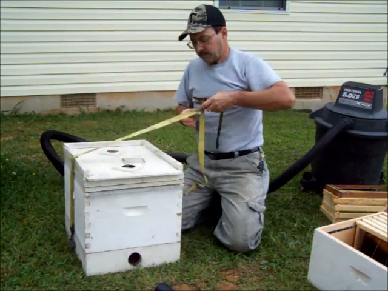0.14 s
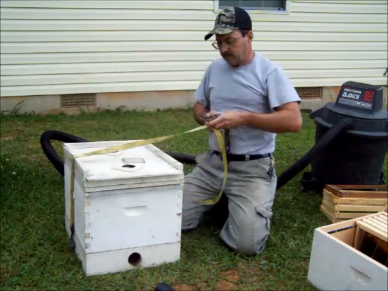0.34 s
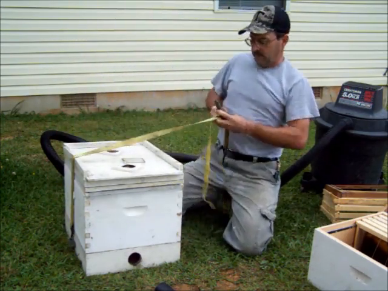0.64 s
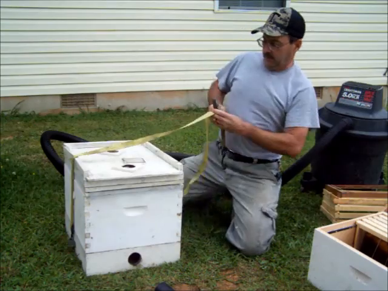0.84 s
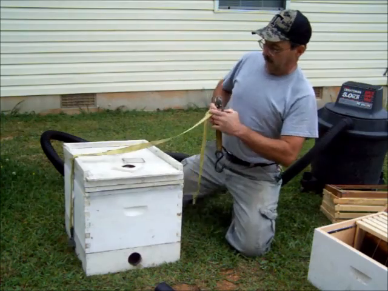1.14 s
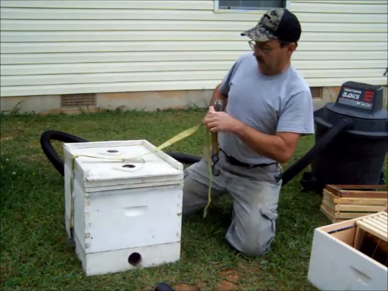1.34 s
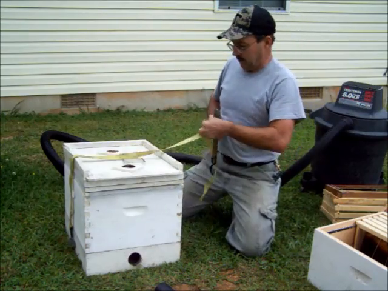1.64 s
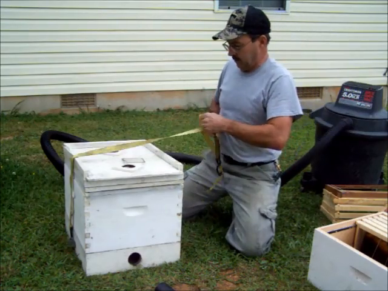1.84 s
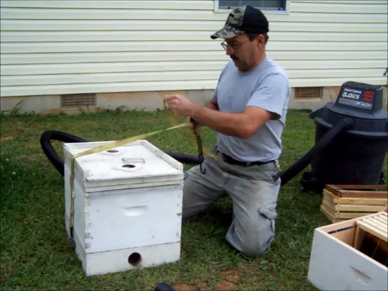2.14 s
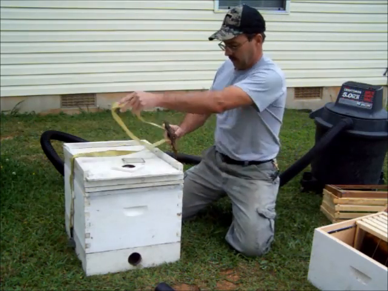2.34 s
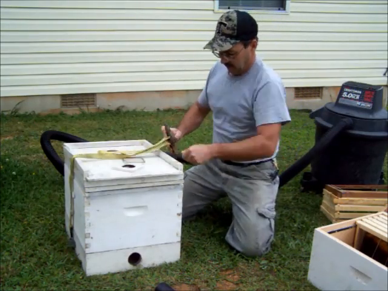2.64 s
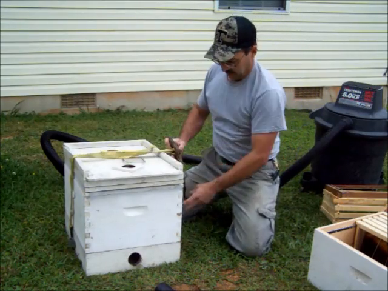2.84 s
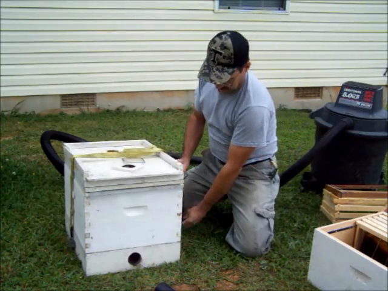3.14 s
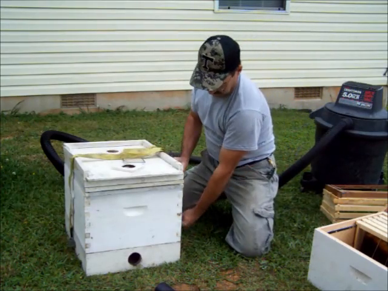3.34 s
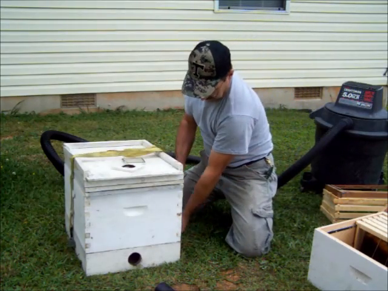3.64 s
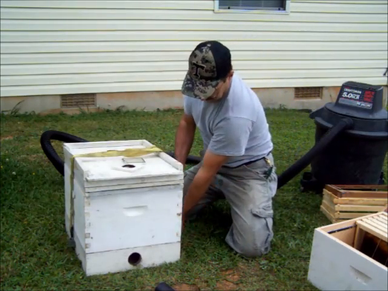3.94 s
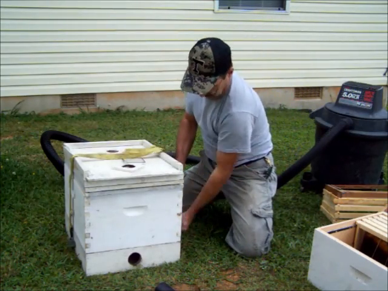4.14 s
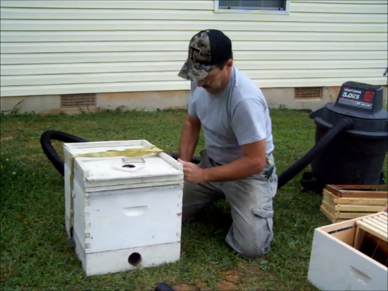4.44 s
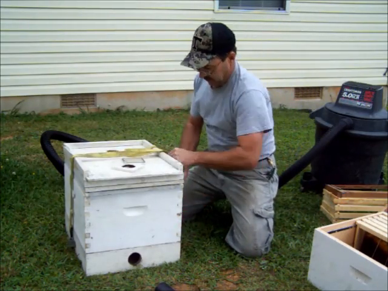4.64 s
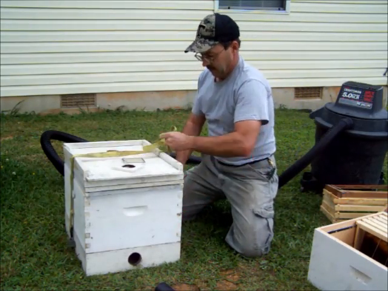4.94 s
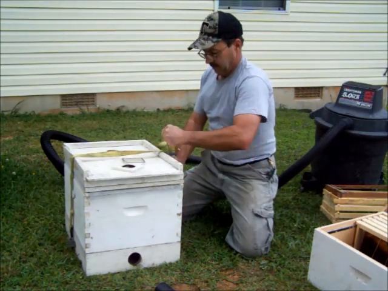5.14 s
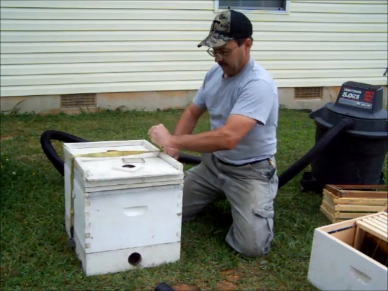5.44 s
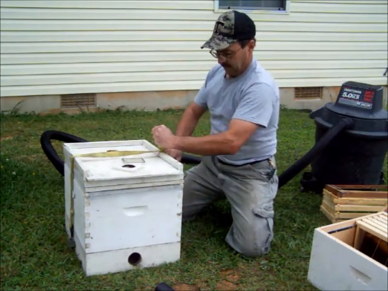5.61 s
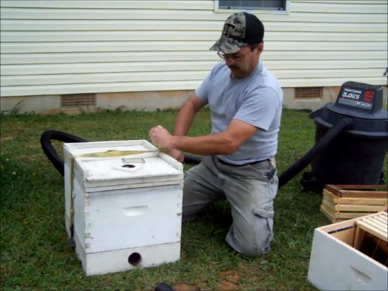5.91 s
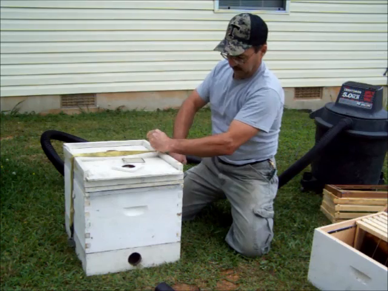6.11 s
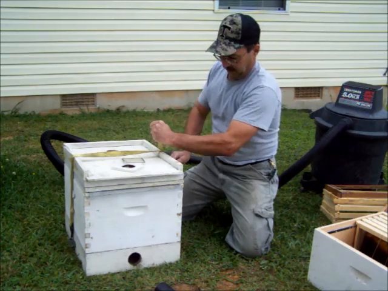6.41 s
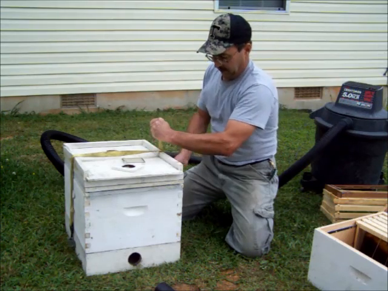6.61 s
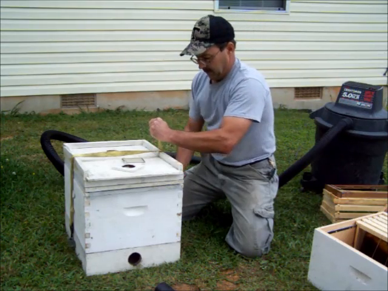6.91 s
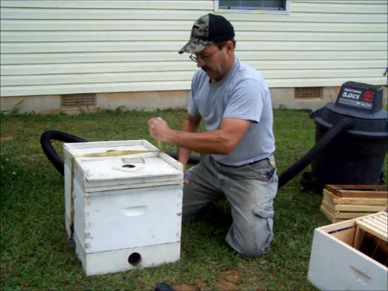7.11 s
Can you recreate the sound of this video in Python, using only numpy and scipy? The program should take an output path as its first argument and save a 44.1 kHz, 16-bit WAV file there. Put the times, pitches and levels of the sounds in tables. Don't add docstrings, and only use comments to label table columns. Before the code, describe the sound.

Outdoors on a lawn, a strap buckle ticks faintly, then knocks once, loudly and hollowly, on a wooden box. Lighter knocks and a double steel hook clank follow. Near the end come hard ratchet snaps mixed with boxy thumps, ending in a rapid run. A small bird repeats a phrase over faint crickets, distant hum and wind. The microphone is a few metres away, with a short slap off a house wall.

```python
import sys
import numpy as np
from scipy import signal
from scipy.io import wavfile
from scipy.ndimage import uniform_filter1d

SR = 44100
rng = np.random.default_rng(int(sys.argv[2]) if len(sys.argv) > 2 else 0)


def voltage_ratio(level):
    return 10 ** (np.asarray(level, float) / 20)


def generate_wav(signal):
    frames = np.transpose(np.atleast_2d(signal))
    scaled = np.clip(frames, -1, 1) * 32767
    pcm = np.round(scaled).astype(np.int16)
    wavfile.write(sys.argv[1], SR, pcm)


N = 320607
LEAD_MS = 8

# t/s, peak level/dB, rebound re first blow/dB, brightest f/Hz, wall echo/dB
TEETH = [
    (5.9945, -22.5, 0.5, 4170, -6.5),
    (6.186, -23.5, 2, 4080, -3.5),
    (6.4481, -5, -1.5, 4140, -10.5),
    (6.797, -2, 4.5, 4110, -8.5),
    (6.8573, -2.5, -2, 5050, -15),
    (6.9136, -29, 2, 4000, -9),
    (7.053, -24.5, 0.5, 4010, -6.5),
    (7.1455, -6, 3, 4400, -9),
    (7.2192, -3, -0.5, 4070, -13.5),
    (7.2355, -6, 0.5, 3540, -22.5),
]
# t/s, peak level/dB, brightest f/Hz, wall echo/dB
TICKS = [
    (0.066, -18.5, 2580, -20),
    (0.757, -41, 6460, -2.5),
    (1.838, -43, 7340, -18),
    (1.022, -36.5, 6400, -17.5),
    (2.472, -30, 3350, -26),
    (3.998, -40, 6290, -18),
    (6.508, -30, 5660, -8),
    (7.05, -38, 5360, -23),
    (7.192, -20.5, 3580, -6),
    (7.25, -20, 3860, -28),
]
# f/Hz, level/dB
FRAME_MODES = [(1500, -17), (2300, -11), (3200, 0), (4150, 7.5), (5000, 2.5), (5900, 4), (7000, -5),
               (8200, -17)]
# t/s, peak level/dB, hardness/(dB per octave), panel f/Hz, wall echo/dB
KNOCKS = [(0.993, -32, 4, 191, -3), (2.4326, -1.5, 3.5, 227, -17), (3.681, -26.5, 3, 227, -17),
          (3.76, -14.5, 6.5, 263, -15), (3.8598, -17.5, 2.5, 252.5, -11), (5.96, -31, -7, 202, -15),
          (5.999, -31.5, -9, 207, 4), (6.279, -6, -2.4, 223.4, -6.5), (6.449, -16.5, 0, 236.5, -8.5),
          (6.555, -4.5, -0.4, 246, -17.5), (6.6591, -12, -0.5, 244, -6), (6.793, -28, -1, 227, -21),
          (6.828, -16, -3.5, 247, -17), (6.886, -16.5, -1.5, 248, -11), (6.916, -20.5, -5, 189, -3),
          (6.95, -27.5, 2, 261, -2), (7.051, -25.5, -2, 218, -4), (7.116, -16.5, -4, 247, -14),
          (7.15, -21, 4.5, 237, -19), (7.227, -15.5, -5, 254, -19), (7.236, -9.5, -5, 247, -5.5),
          (7.248, -20, 6, 274, -9)]
# f re panel pitch/1, t60/ms, level/dB
BOX_MODES = [(0.9, 370, -18), (1.0, 105, 1.5), (1.18, 60, 1), (1.5, 67, -5), (2.2, 32.5, -1.5),
             (2.7, 31.4, -3), (3.4, 32, -7), (4.1, 11, -0.5), (5.0, 110, -32), (6.0, 65, -31.5),
             (7.2, 7.3, -32), (8.6, 9.6, -53.5), (10.5, 15, -38.5)]
# t/s, peak level/dB, rattle/ms, hardness/(dB per octave), wall echo/dB
CLANKS = [
    (4.005, -29, 3.0, -9, -18),
    (4.017, -12, 5.0, -2.5, -5.5),
    (4.048, -36, 1.96, -3, -1),
    (4.062, -24.5, 3.3, -4, -3.5),
    (4.0793, -13, 4.3, -2, -16),
    (4.124, -28.5, 3.2, -2.5, -13),
]
# f/Hz, t60/ms, level/dB
HOOK_MODES = [(345, 81, -3), (545, 78, -1), (650, 44, 3.5), (699, 61, -4), (852, 27, -4), (1030, 30, -6),
              (1310, 31, 1), (1780, 34, -7), (1891, 80, -5.5), (2590, 23, -5), (2900, 75, -16),
              (3570, 41, -3), (3930, 40, -2.5), (4400, 30, -4), (4600, 41, -10)]
# t/s, length/s, start f/Hz, end f/Hz, rms level/dB
PHRASE = [
    (-0.004, 0.13, 2713, 2358, -45),
    (0.156, 0.036, 2757, 3047, -44),
    (0.216, 0.013, 3370, 3670, -49),
    (0.227, 0.019, 3543, 4390, -43.5),
    (0.291, 0.018, 4500, 4720, -48.5),
    (0.318, 0.034, 2504, 2120, -49.5),
]
# t/s, level/dB, extra level of the rising chirp/dB
SONG = [(1.347, -2, 7), (1.765, -0.5, 5.5), (2.197, -0.2, 5.5), (4.432, -5, 6), (4.858, -1, 5),
        (5.289, -1.9, 5.5)]
# t/s, length/s, rms level/dB
SHRILL = [(6.24, 0.061, -48.5), (6.3, 0.1, -43), (6.38, 0.17, -52), (6.52, 0.15, -57)]
# f/Hz, width/Hz, rms level/dB, throb depth/dB
CRICKETS = [(3864, 310, -51, 0), (4300, 700, -52.5, 2)]
HUM_HZ = (88.2, 132.5, 267, 188)
# t/s, length/s, rms level/dB
HUM_LOW = [(0.0, 1.4, -59), (1.4, 0.96, -52), (2.15, 0.55, -48.5), (2.75, 0.94, -50), (3.6, 2.2, -53),
           (5.7, 0.56, -37.5), (6.3, 0.49, -59.5)]
HUM_MID = [(-0.2, 0.66, -54.5), (0.45, 1.6, -51.5), (2.0, 1.4, -56), (3.8, 0.45, -50), (4.4, 1.4, -49.5),
           (5.75, 0.52, -40.5), (6.25, 0.59, -42), (6.7, 0.8, -47)]
HUM_HIGH = [(-0.1, 0.51, -64), (0.9, 0.35, -55.5), (1.1, 0.65, -49), (2.15, 0.54, -56), (2.75, 1, -51.5),
            (3.6, 0.86, -52.5), (4.5, 0.43, -56), (5.95, 0.3, -48.5), (6.3, 0.33, -40), (6.7, 0.8, -48)]
HUM_THIRD = [(0.95, 0.81, -55.5), (2.5, 0.91, -55)]
# t/s, tyre level/dB
TYRES = [(0.0, -43.5), (1.6, -42.5), (2.4, -48), (3.1, -48.5), (4.0, -45.5), (4.9, -47.5), (5.9, -53),
         (6.6, -57), (7.27, -54)]
# t/s, length/s, rms level/dB
RUSTLE = [(0.72, 0.32, -51), (1.5, 0.67, -58.5), (2.05, 0.28, -45), (3.28, 0.13, -53.5), (4.72, 0.32, -53),
          (6.4, 0.19, -61.5), (6.78, 0.28, -49.5), (7.1, 0.3, -47)]
# t/s, length/s, rumble level/dB, flutter re rumble/dB
GUSTS = [(-0.2, 1.65, -52, 1), (1.4, 2.2, -59, 6.5), (3.451, 0.5, -49, -4), (3.8, 0.38, -47.5, 6.5),
         (4.15, 0.8, -53.5, 1), (4.48, 0.22, -42.5, -12), (4.931, 0.46, -39.5, -14), (5.3, 0.5, -43.5, -4),
         (5.74, 0.37, -32.5, -10), (5.98, 0.39, -37, -3.2), (6.28, 0.45, -50.5, 11.5),
         (6.78, 0.28, -36.5, -5), (7.1, 0.51, -47, 7)]
# f/Hz, density level/(dB per Hz)
HISS_SPECTRUM = [(35, -33), (60, 3), (114, -13), (229, -6), (293, -1.5), (434, -8), (481, -3.5), (840, -5),
                 (2400, -12), (3340, -9), (3860, -12.5), (5050, -28), (7320, -51.5), (7780, -36),
                 (8280, -47), (10800, -87.5), (18200, -120)]


def ratchet():
    out = np.zeros(N)
    for s, peak_db, rebound_db, bright_hz, wall_db in TEETH:
        snap = clatter(1.5, 3.4, bright_hz, 2.1, rebound_db)
        add(out, s, snap, peak_db, wall_db)
    for s, peak_db, bright_hz, wall_db in TICKS:
        add(out, s, clatter(0.4, 1.2, bright_hz, 20), peak_db, wall_db)
    return out


def box():
    out = np.zeros(N)
    ratio, t60_ms, db = np.transpose(BOX_MODES)
    wood = signal.butter(2, [750, 2200], "band", fs=SR, output="sos")
    for s, peak_db, hard_db, panel_hz, wall_db in KNOCKS:
        mode_db = db + hard_db * np.log2(ratio)
        push = chatter(0.3, 3.4, -33)
        boom = ring(push, ratio * panel_hz, t60_ms, mode_db, 0.91, 1.65 / ratio, order=0)
        crack = peak(signal.sosfilt(wood, chatter(0.21, 6.1, -18)))
        crack_db = -14 + 0.31 * hard_db
        add(out, s, boom + voltage_ratio(crack_db) * crack, peak_db, wall_db)
    return signal.sosfilt(signal.butter(5, 180, "high", fs=SR, output="sos"), out)


def hook():
    out = np.zeros(N)
    hz, t60_ms, db = np.transpose(HOOK_MODES)
    for s, peak_db, rattle_ms, hard_db, wall_db in CLANKS:
        mode_db = db + hard_db * np.log2(hz / 1000)
        body = ring(chatter(0.072, rattle_ms, -20), hz, t60_ms, mode_db, 0.38, 300 / hz)
        crack_db = 2.5 + 0.46 * peak_db
        crack = clatter(0.25, 4.1, 4100, 7.8)
        add(out, s, body + voltage_ratio(crack_db) * crack, peak_db, wall_db)
    return signal.sosfilt(signal.butter(2, 220, "high", fs=SR, output="sos"), out)


def clatter(slide_ms, rattle_ms, bright_hz, focus_db, rebound_db=-2, count=26):
    hz = np.geomspace(1500, 8200, count) * (1 + 0.01 * rng.standard_normal(count))
    frame_hz, frame_db = np.transpose(FRAME_MODES)
    db = np.interp(np.log(hz), np.log(frame_hz), frame_db) - focus_db * np.log2(hz / bright_hz) ** 2
    hz, db = np.append(hz, bright_hz), np.append(db, db.max() + 6.5)
    t60_ms = np.append(np.full(count, 10), 6.9)
    push = chatter(slide_ms, rattle_ms, -27)
    swings = round(1.4 * rng.uniform(0.92, 1.08) * bright_hz / 1000)
    push[LEAD_MS * SR // 1000 + round(swings * SR / bright_hz)] = voltage_ratio(rebound_db)
    frame = disperse(ring(push, hz, t60_ms, db, 0.5, 300 / hz, order=0))
    return peak(signal.sosfilt(signal.butter(3, 2630, "high", fs=SR, output="sos"), frame))


def disperse(x):
    spread_hz, width_hz = 4900, 2660
    pole = np.exp(-np.pi * width_hz / SR)
    turn = -2 * pole * np.cos(2 * np.pi * spread_hz / SR)
    return signal.sosfilt([[pole ** 2, turn, 1, 1, turn, pole ** 2]] * 3, x)


def ring(push, hz, t60_ms, db, scatter_db, build_ms, order=1):
    ms = np.arange(len(push)) * 1000 / SR
    level_spot, pitch_spot = rng.standard_normal((2, len(hz)))
    decay = voltage_ratio(-60 * ms / t60_ms[:, None]) * (1 - np.exp(-ms / build_ms[:, None]))
    turns = (hz * (1 + 0.006 * pitch_spot))[:, None] * ms / 1000
    sign = (-1) ** (order * np.arange(len(hz)))
    gains = voltage_ratio(db + scatter_db * level_spot) * sign
    modes = gains @ (decay * np.sin(2 * np.pi * turns))
    return peak(signal.fftconvolve(push, modes)[:len(push)])


def chatter(slide_ms, rattle_ms, small_db):
    ms = np.arange(SR // 5) * 1000 / SR - LEAD_MS
    shape = np.exp(np.where(ms < 0, ms / max(slide_ms, 0.05), -ms / max(rattle_ms, 0.05)))
    grains = rng.standard_normal(len(ms)) * voltage_ratio(2 * rng.exponential(size=len(ms)))
    contacts = voltage_ratio(small_db) * shape * grains
    contacts[LEAD_MS * SR // 1000] = 1
    return contacts


def add(out, s, sound, db, wall_db):
    wall_ms, siding_ms, siding_db = 17.7, 5.25, -0.5
    u = np.arange(SR // 12) * 1000 / SR / siding_ms
    yard = rng.standard_normal(len(u)) * u * np.exp(-u)
    yard *= voltage_ratio(siding_db) / np.linalg.norm(yard)
    yard = signal.sosfilt(signal.butter(1, 700, "high", fs=SR, output="sos"), yard)
    yard[0] = 1
    back = voltage_ratio(wall_db) * signal.fftconvolve(sound, yard)
    for start, part in ((s, sound), (s + wall_ms / 1000, back)):
        i = int((start - LEAD_MS / 1000) * SR)
        out[i:i + len(part)] += voltage_ratio(db) * part[:max(N - i, 0)]


def bird():
    out = np.zeros(N)
    for start, phrase_db, chirp_db in SONG:
        for k, (s, length, from_hz, to_hz, db) in enumerate(PHRASE):
            bend = 0.4 if k == len(PHRASE) - 1 else 1.05
            u = np.linspace(0, 1, int(length * SR))
            hz = (from_hz + (to_hz - from_hz) * u ** bend) * (1 + 0.006 * rng.standard_normal())
            note = np.sin(np.pi * u ** 0.8) ** 0.9 * np.sin(2 * np.pi * np.cumsum(hz) / SR)
            is_chirp = 3000 < from_hz < 4000
            i = int((start + s) * SR)
            out[i:i + len(u)] += voltage_ratio(db + phrase_db + chirp_db * is_chirp) * unit(note)
    t = np.arange(SR // 4) / SR
    trees = rng.standard_normal(len(t)) * voltage_ratio(-60 * t / 0.35) * (t > 0.012)
    smeared = signal.fftconvolve(out, trees / np.linalg.norm(trees))[:N]
    return out * voltage_ratio(2 * walk(90)) + voltage_ratio(-2) * smeared


def insects():
    throb = tone(29.4 * (1 + 0.12 * walk(2)))
    chorus = sum(voltage_ratio(db + throb_db * throb) * band(hz, width) for hz, width, db, throb_db in CRICKETS)
    shrill = tone(4800 + 6 * walk(20)) * voltage_ratio(1.5 * walk(60))
    return chorus + np.sqrt(2) * swells(SHRILL, 0.012) * shrill


def hum():
    t = np.arange(N) / SR
    beat = 1 + 0.22 * np.cos(2 * np.pi * 3.3 * (t - 2.27))
    gains = beat * swells(HUM_LOW, 0.041), swells(HUM_MID, 0.1), swells(HUM_HIGH, 0.085), swells(HUM_THIRD, 0.11)
    out = np.zeros(N)
    for hz, gain in zip(HUM_HZ, gains):
        out += np.sqrt(2) * gain * voltage_ratio(1.3 * walk(6)) * tone(hz * (1 + 0.0038 * walk(3.3)))
    return out


def traffic():
    engines = voltage_ratio(-59) + voltage_ratio(-2) * swells(HUM_HIGH, 0.22)
    tyres_db, = curve(TYRES)
    return engines * band(312.4, 84) + voltage_ratio(tyres_db - 5) * band(1296, 1000)


def leaves():
    level = np.hypot(voltage_ratio(-53), swells(RUSTLE, 0.057))
    return level * voltage_ratio(1.2 * walk(40) - 3.5) * band(4350, 3800)


def wind():
    rumble = swells([row[:3] for row in GUSTS], 0.11)
    flutter = swells([(s, length, db + over_db) for s, length, db, over_db in GUSTS], 0.044)
    out = rumble * voltage_ratio(walk(24)) * band(50, 44)
    out += flutter * voltage_ratio(0.95 * walk(25)) * band(133.3, 110)
    return out + voltage_ratio(30.5) * flutter ** 1.97 * band(290, 200)


def air():
    table_hz, table_db = np.transpose(HISS_SPECTRUM)
    hiss = np.zeros(N)
    for hz in 70 * 2 ** np.arange(0, 7.2, 0.5):
        db = np.interp(np.log(hz), np.log(table_hz), table_db)
        hiss += voltage_ratio(db + 0.14 * walk(5.4)) * np.sqrt(hz) * band(hz, hz / 3)
    return voltage_ratio(-45.5) * unit(hiss)


def swells(table, edge_s):
    t = np.arange(N) / SR
    power = np.zeros(N)
    for s, length, db in table:
        ramp = np.clip(np.minimum(t - s, s + length - t) / edge_s, 0, 1)
        power += (voltage_ratio(db) * ramp) ** 2
    return np.sqrt(power)


def curve(table):
    s, *columns = np.transpose(table)
    return [np.interp(np.arange(N) / SR, s, c) for c in columns]


def tone(hz):
    return np.sin(2 * np.pi * np.cumsum(hz) / SR)


def band(hz, width):
    edges = [max(hz - width / 2, 10), hz + width / 2]
    sos = signal.butter(2, edges, "band", fs=SR, output="sos")
    return unit(signal.sosfilt(sos, rng.standard_normal(N)))


def walk(rate):
    k = int(SR / rate)
    steps = np.repeat(rng.standard_normal(N // k + 1), k)
    return unit(uniform_filter1d(uniform_filter1d(steps, k), k)[:N])


def unit(x):
    return x / np.sqrt(np.mean(x ** 2))


def peak(x):
    return x / np.max(np.abs(x))


def scene():
    near = ratchet() + box() + hook()
    far = bird() + insects() + hum() + traffic()
    return (near + far + leaves() + wind() + air())[None]


def roll_off(x):
    return signal.sosfilt(signal.butter(12, 8430, fs=SR, output="sos"), x)


def record(dry):
    rounded = 1.53 * np.tanh(dry / 1.472)
    mix = signal.sosfilt(signal.cheby2(12, 60, 8763, fs=SR, output="sos"), rounded)
    return roll_off(mix)


dry = scene()
out = record(dry)
generate_wav(out)
```